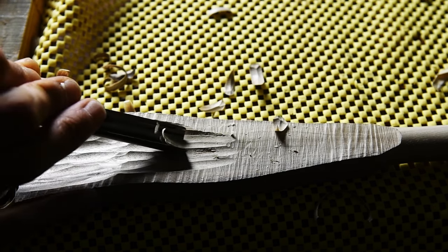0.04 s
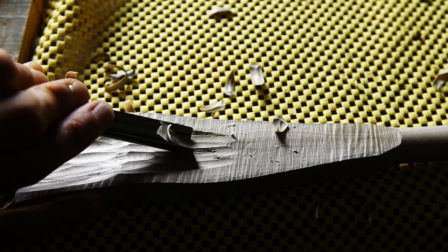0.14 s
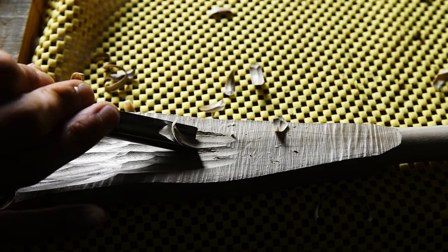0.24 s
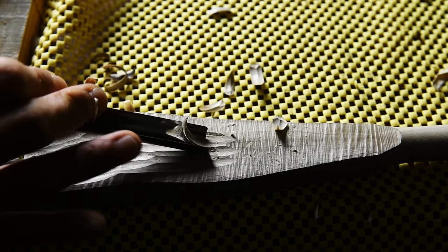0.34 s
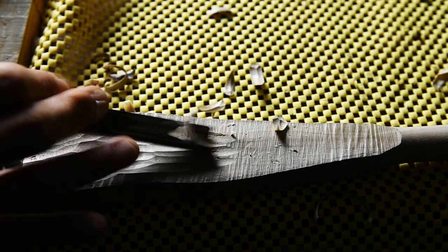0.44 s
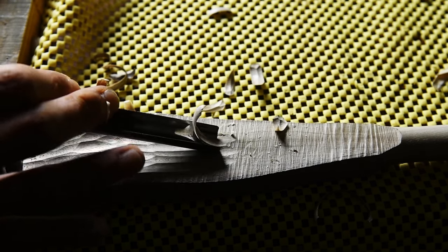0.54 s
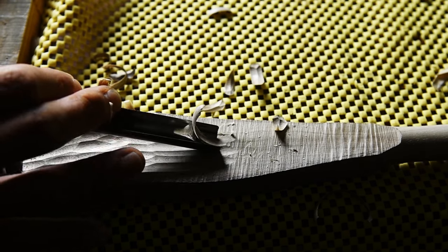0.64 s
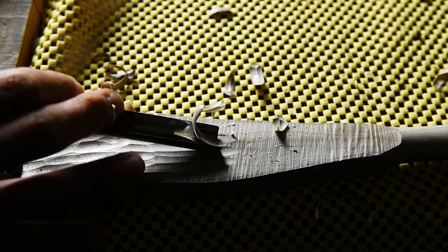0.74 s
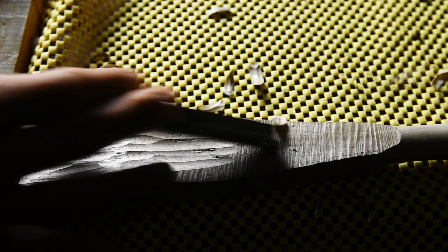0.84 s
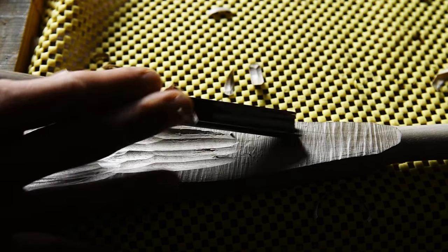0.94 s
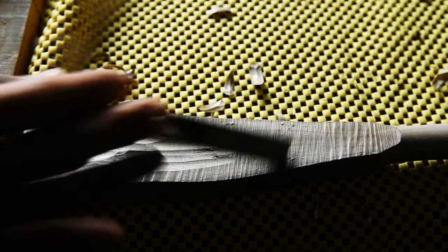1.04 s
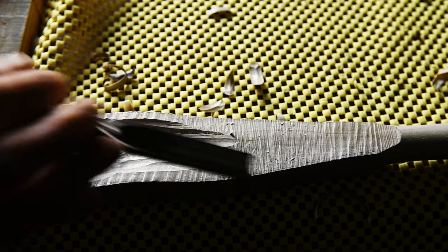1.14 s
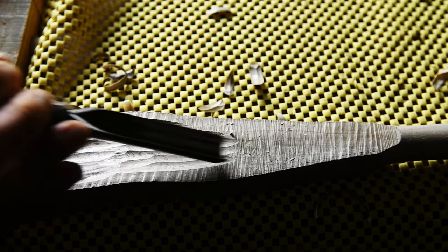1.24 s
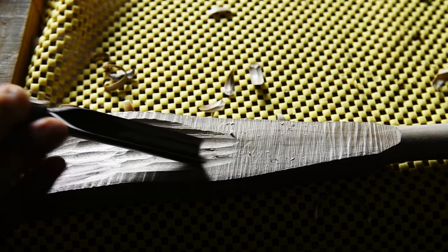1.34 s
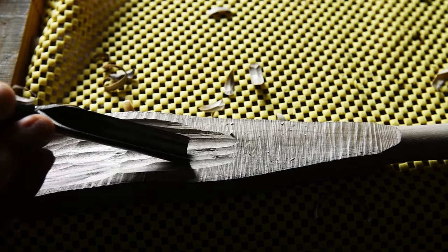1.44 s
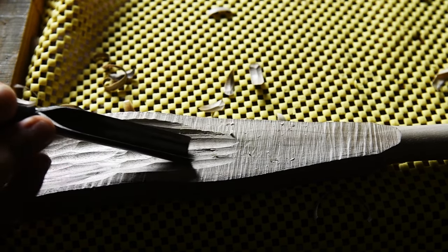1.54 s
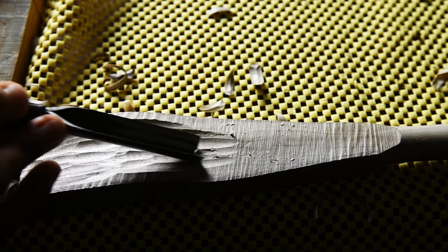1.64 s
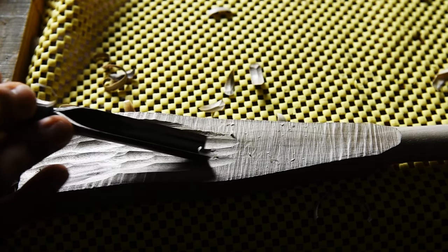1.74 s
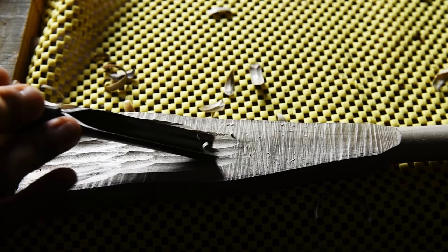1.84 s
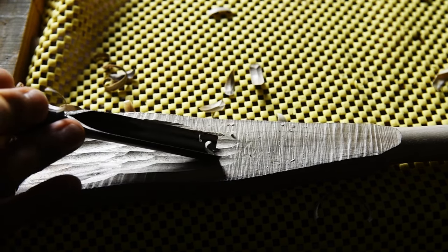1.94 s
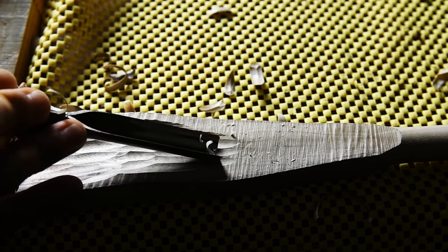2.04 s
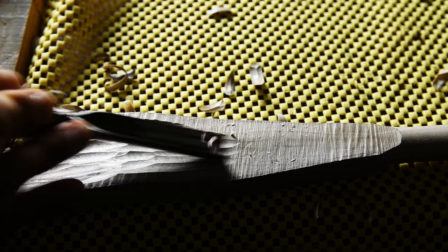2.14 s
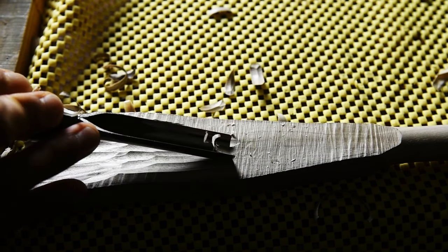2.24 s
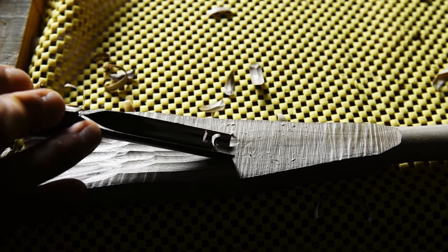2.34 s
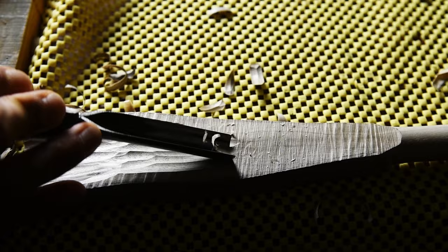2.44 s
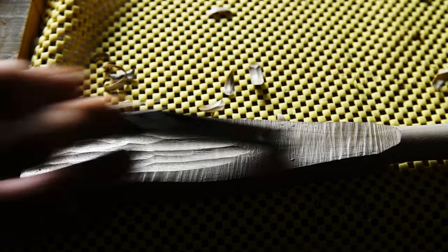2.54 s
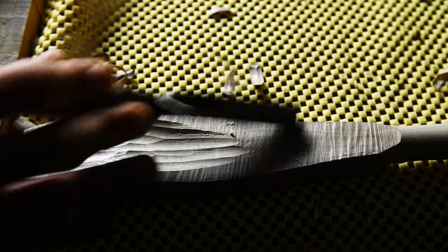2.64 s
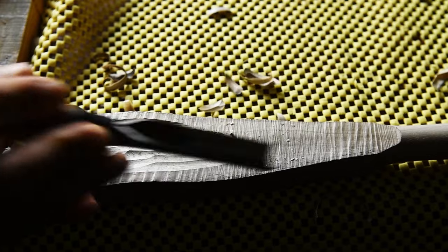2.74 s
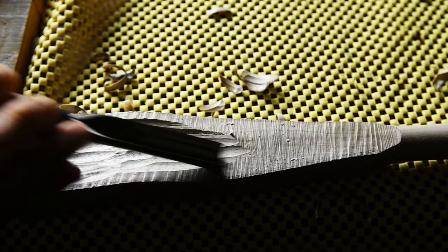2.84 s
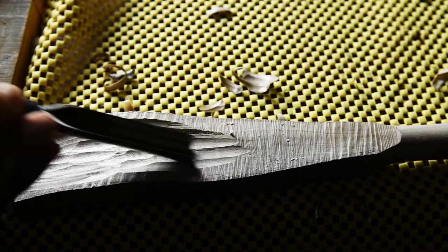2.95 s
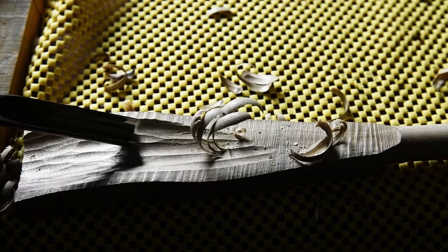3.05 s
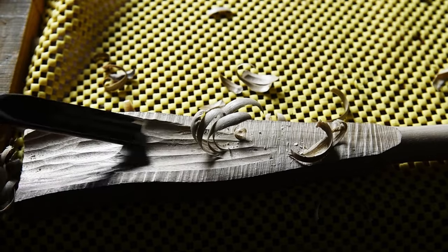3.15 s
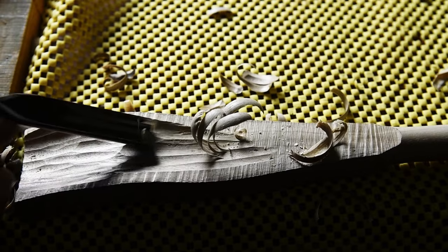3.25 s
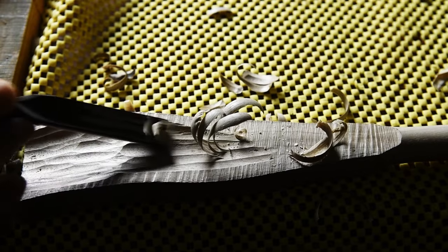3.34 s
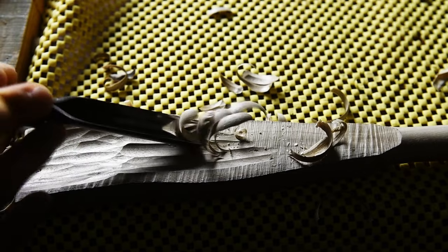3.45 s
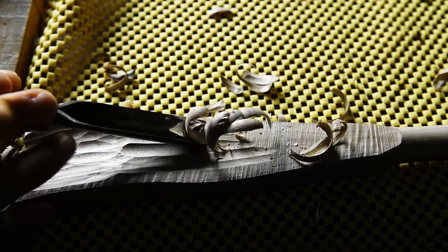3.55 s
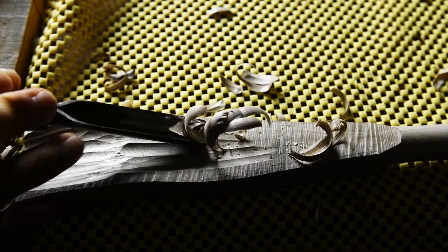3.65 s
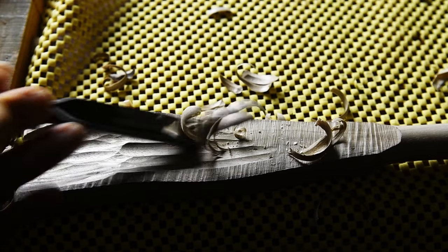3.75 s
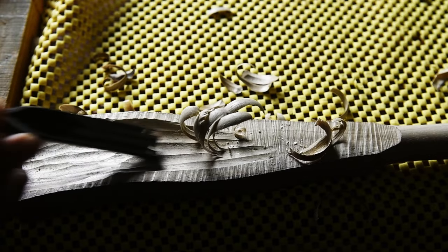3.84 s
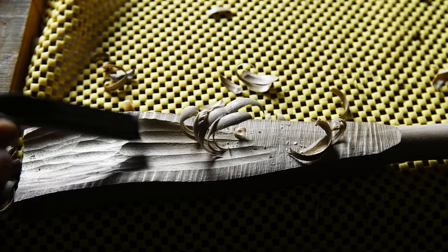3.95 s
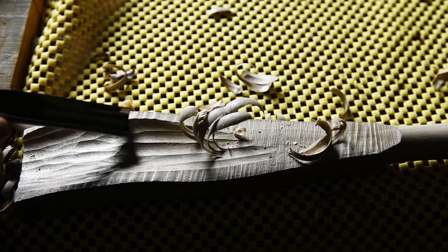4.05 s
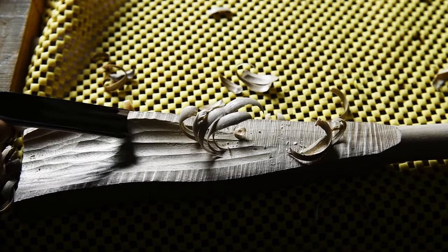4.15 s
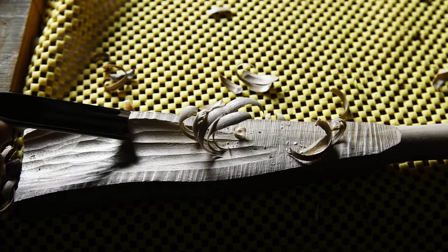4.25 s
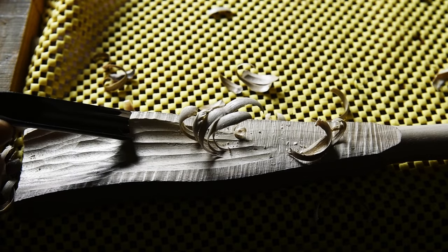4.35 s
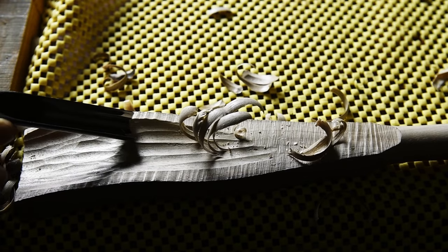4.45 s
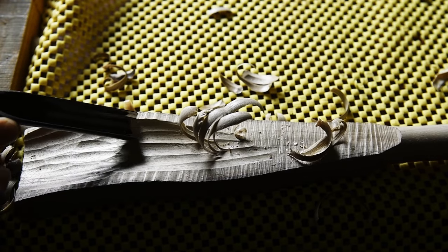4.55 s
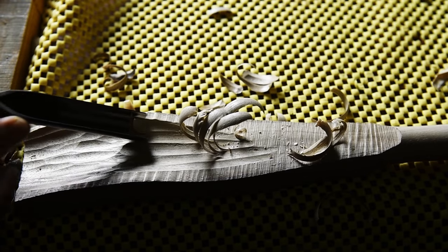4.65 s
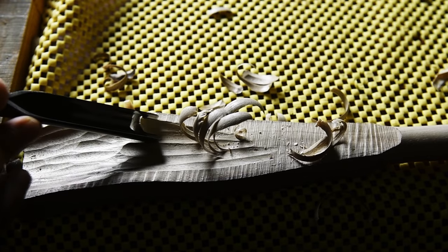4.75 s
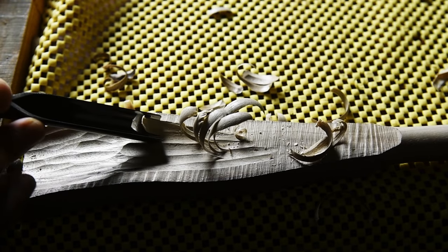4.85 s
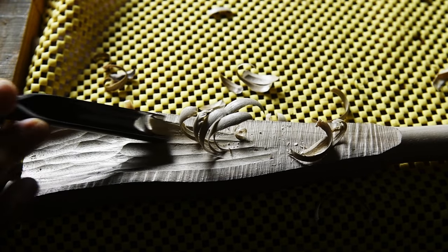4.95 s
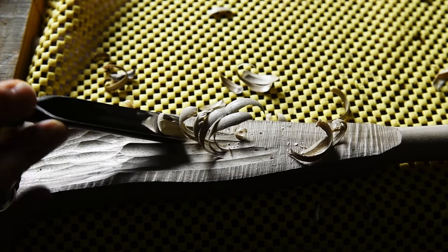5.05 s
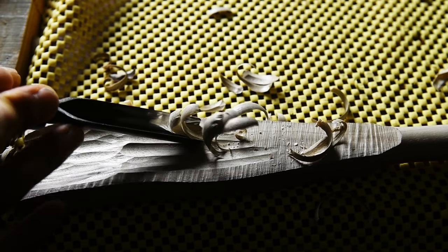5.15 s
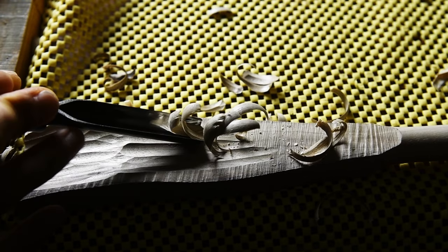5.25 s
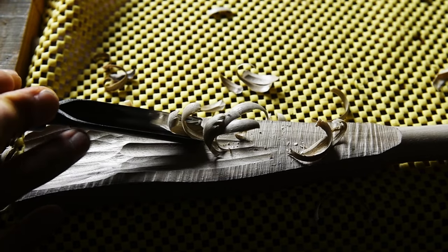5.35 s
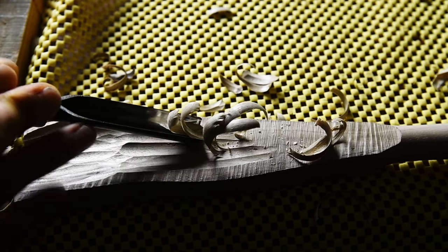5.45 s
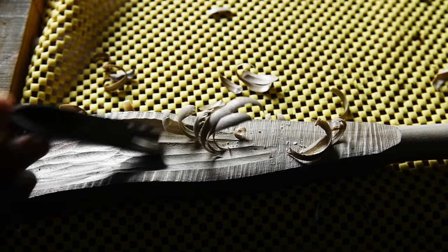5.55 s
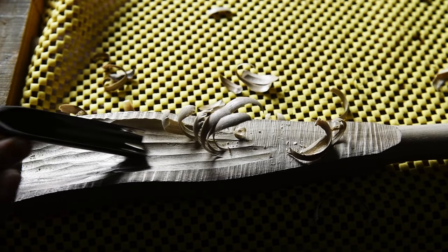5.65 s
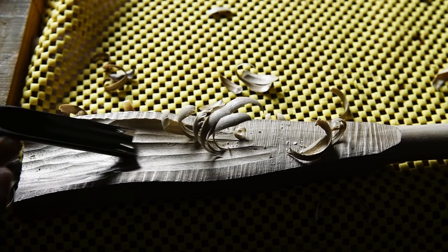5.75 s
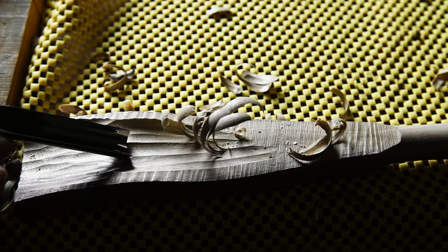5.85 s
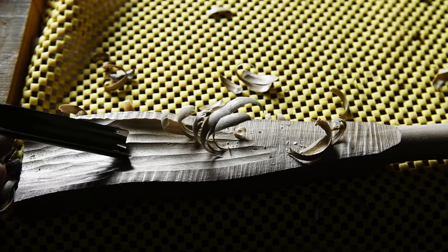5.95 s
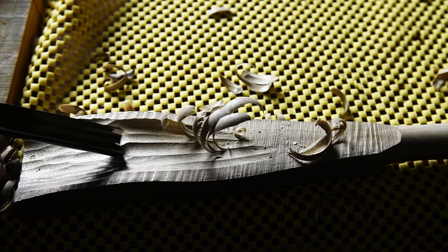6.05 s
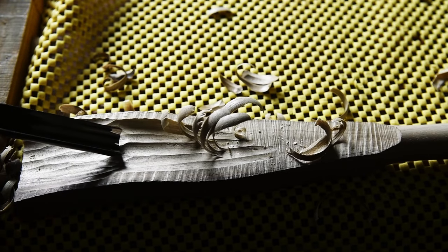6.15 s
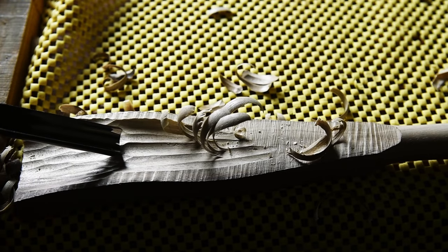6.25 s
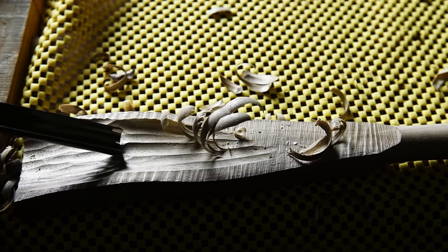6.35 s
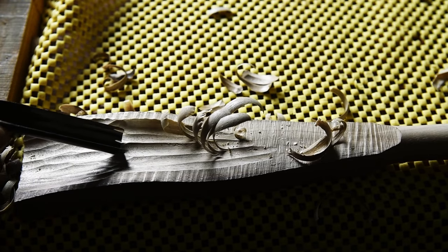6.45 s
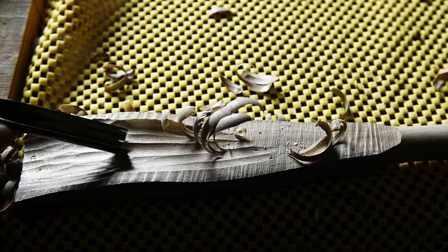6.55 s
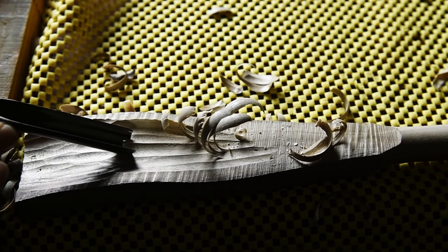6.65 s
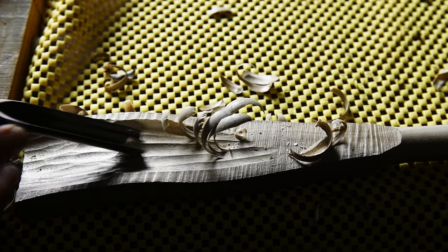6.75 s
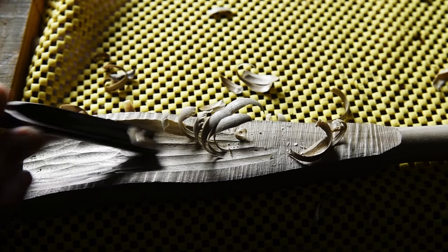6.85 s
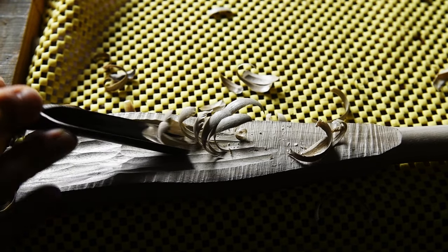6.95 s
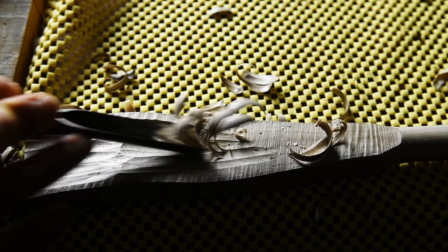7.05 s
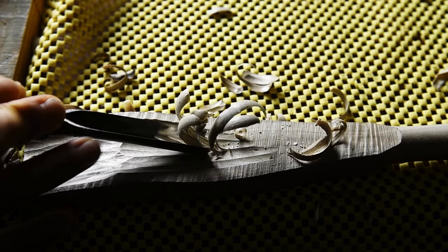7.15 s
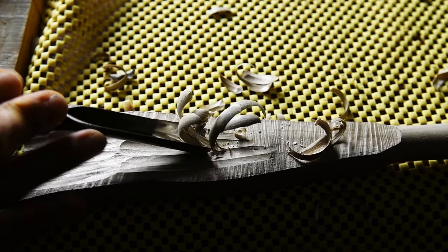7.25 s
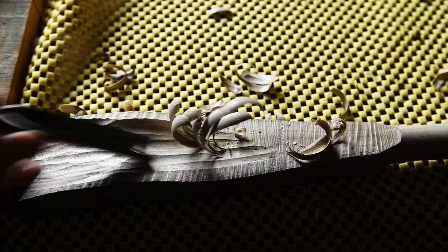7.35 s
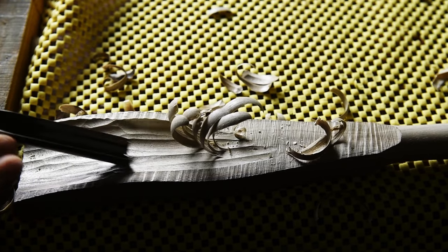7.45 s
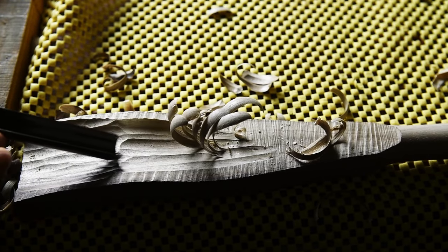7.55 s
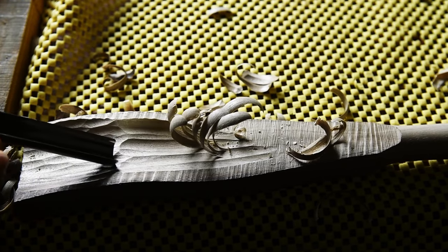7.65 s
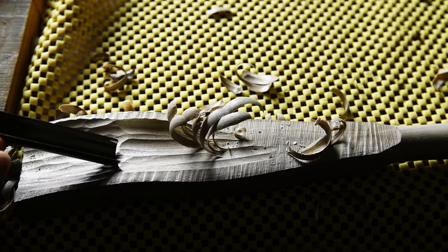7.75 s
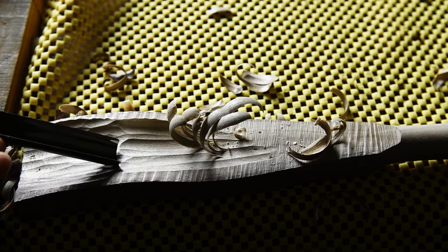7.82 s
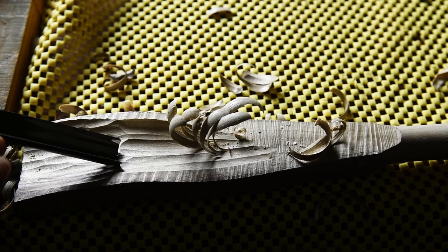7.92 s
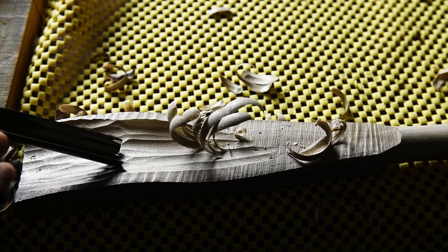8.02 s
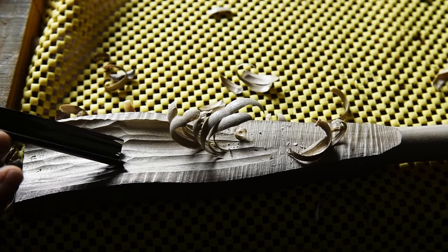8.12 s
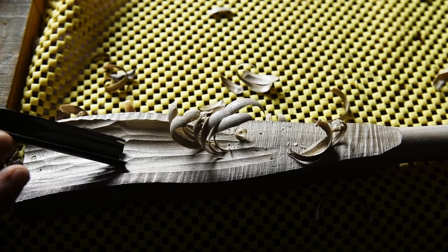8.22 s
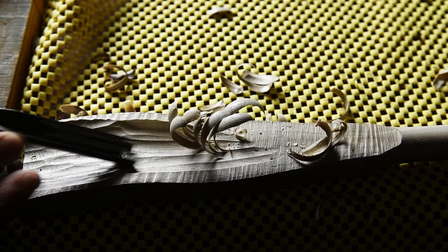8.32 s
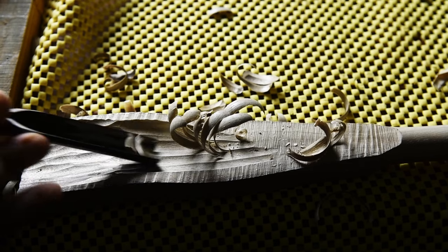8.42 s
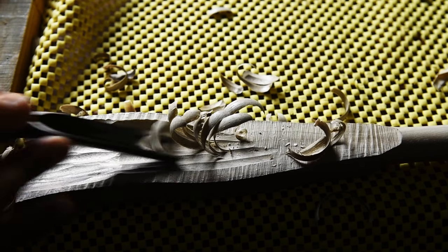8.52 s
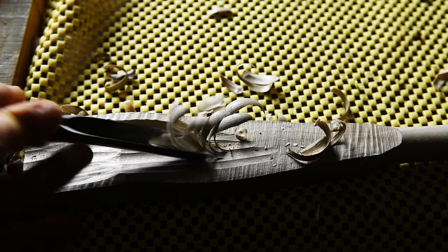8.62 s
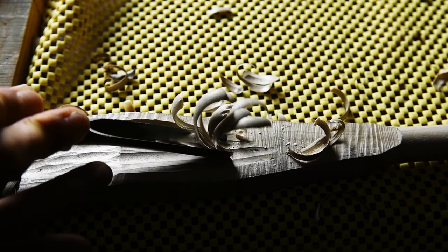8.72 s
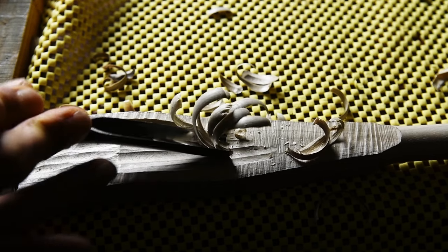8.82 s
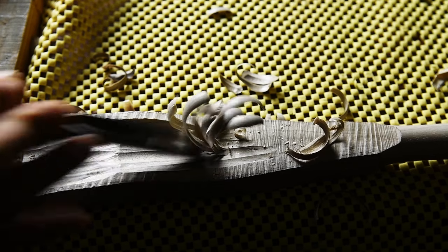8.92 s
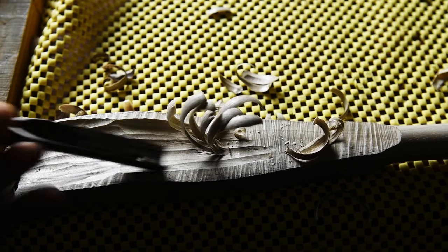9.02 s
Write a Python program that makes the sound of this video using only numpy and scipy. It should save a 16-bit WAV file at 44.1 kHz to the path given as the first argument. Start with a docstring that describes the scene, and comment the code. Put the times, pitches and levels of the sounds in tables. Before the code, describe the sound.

A hand gouge pares hardwood in uneven, crackling scrapes, with sharp tool knocks and snapping shavings, close up in a small workshop.

```python
"""A hand gouge pares hardwood in uneven, crackling pushes, close and almost mono in a small workshop.
The edge sticks and slips, tearing fibres that ring the blade and the wooden blank; dry shavings snap.
The tool knocks and drags on the wood, the bench thuds under the pushes, and a woven sleeve swishes.
Faint high rustles come between cuts; room tone and mains hum lie underneath."""
import sys
import numpy as np
from scipy import signal
from scipy.fft import irfft
from scipy.io import wavfile
from scipy.ndimage import uniform_filter1d

SR = 44100
rng = np.random.default_rng(int(sys.argv[2]) if len(sys.argv) > 2 else 0)


def store_wav(level_fs):
    """Save 16-bit WAV to argv[1]."""
    pcm = np.round(np.clip(np.atleast_2d(level_fs), -1, 1) * 32767)
    wavfile.write(sys.argv[1], SR, pcm.T.astype(np.int16))


N = 400428
T = np.arange(N) / SR

def gain_of(db):
    """dB to gain."""
    return 10 ** (np.asarray(db) / 20)

def unit(h):
    """Scale to energy 1."""
    return h / np.sqrt(np.sum(h ** 2) + 1e-30)

def add(mix, start_s, sound):
    """Mix a sound in at start_s."""
    part = mix[round(start_s * SR):][:len(sound)]
    part += sound[:len(part)]

def stroke(length_s, top, first, peak, last):
    """Ramp from first to peak at fraction top of the length, then to last."""
    position = np.linspace(0, 1, round(length_s * SR))
    return np.interp(position, (0, np.clip(top, .01, .99), 1), (first, peak, last))

def soft(x):
    """Taper both ends."""
    return x * signal.windows.tukey(len(x), .1)

def slow_noise(samples):
    """Twice-smoothed noise, standard deviation 1."""
    noise = uniform_filter1d(uniform_filter1d(rng.standard_normal(N), samples), samples)
    return noise / noise.std()

def colour(x, points):
    """Filter x by a spectrum of (Hz, relative dB) points."""
    grid_hz = np.fft.rfftfreq(4096, 1 / SR)
    hz, db = np.transpose(points)
    spectrum = gain_of(np.interp(np.log(grid_hz + 1), np.log(hz), db))
    response = np.roll(irfft(spectrum), 2048) * np.hanning(4096)
    return signal.oaconvolve(x, unit(response), "same")

def ring(modes, floor_hz):
    """Impulse response of resonances that radiate little below floor_hz."""
    t = T[:8192]
    response = sum((-1) ** k * gain_of(db) * width_hz * np.exp(-np.pi * width_hz * t)
                   * np.sin(2 * np.pi * hz * t) for k, (hz, width_hz, db) in enumerate(modes))
    return unit(signal.sosfilt(signal.butter(2, floor_hz, "high", fs=SR, output="sos"), response))

# Room tone spectrum. Each row: frequency in Hz, relative density in dB.
AIR_SPECTRUM = [(15, -60), (25, -17.5), (48, -16.5), (87, -6.5), (108, -11), (242, -4.5), (301, -10.5),
                (451, -9.5), (641, -9), (1290, -11), (1840, -20.5), (14000, -29.5), (16000, -28)]
# Mains partials. Each row: frequency in Hz, nominal rms level in dB.
HUM_PARTIALS = [(59.2, -79.5), (118.4, -79.5), (236.9, -81)]

def air(noise_db=-65.5):
    """Room tone with mains hum that wavers in strength."""
    tone = gain_of(noise_db) * colour(rng.standard_normal(N), AIR_SPECTRUM)
    for hz, db in HUM_PARTIALS:
        waver = uniform_filter1d(rng.standard_normal(N), 6000)
        amplitude = gain_of(db + 3 + 3.5 * waver / waver.std())
        tone += amplitude * np.sin(2 * np.pi * (hz * T + rng.random()))
    return tone

# Stereo hiss spectrum. Each row: frequency in Hz, relative density in dB.
SIDE_SPECTRUM = [(15, -31), (25, -5), (249, -3), (363, -3), (1020, -9.5), (16000, -7.5)]

def side_hiss(level_db=-70.5):
    """Faint hiss that differs between left and right."""
    return gain_of(level_db) * colour(rng.standard_normal(N), SIDE_SPECTRUM)

def reflections(x, build_s=0.014, t60_s=0.31):
    """Sparse, dull workshop echoes build up and die away."""
    taps = np.zeros(SR // 2)
    slots, t = np.arange(200, len(taps) - 20, 20), T[:len(taps)]
    taps[slots + rng.integers(0, 20, len(slots))] = rng.choice([-1., 1.], len(slots))
    build = 1 - np.exp(-(t / build_s) ** 2)
    tail = signal.lfilter([1], [1, -.87], taps * build * gain_of(-60 * t / t60_s))
    return signal.oaconvolve(x, unit(tail))[:N]

# Padded bench. Each row: frequency in Hz, width in Hz, level in dB.
BENCH_MODES = [(57.6, 31, -7), (123, 51, -5)]
# Shoves on the bench. Each row: start in seconds, drive level in dB.
BENCH_THUDS = [(0.0, -55), (0.321, -39), (0.363, -51), (0.791, -37.5), (2.154, -54), (2.518, -43),
               (2.809, -56), (3.041, -56), (3.3, -46), (3.364, -48), (3.438, -47), (3.51, -51.5),
               (6.8, -48), (7.045, -47), (8.346, -35), (8.66, -40)]

def thuds(length_s=0.032):
    """The weight of a push shoves the bench's low modes, softly and roughly."""
    shove, u = np.zeros(N), np.arange(0, 5, 1 / (SR * length_s))
    for start_s, db in BENCH_THUDS:
        add(shove, start_s, gain_of(db - 5.0) * 3 * u * np.exp(1 - 3 * u))
    return signal.oaconvolve(shove * rng.standard_normal(N), ring(BENCH_MODES, 39))[:N]

# Arm moves. Each row: start and length in seconds, fastest point 0-1, peak level in dB,
# thread pitch in Hz at the start, fastest point and end, fraction of cloth rubbing.
SLEEVE_MOVES = [(1.055, .36, 0.5, -49.5, 10740, 11600, 8900, 0.46),
                (1.449, 0.18, 0.32, -63, 8040, 9500, 5400, 0.77),
                (1.567, 0.074, 0.54, -67, 9000, 7800, 8400, 0.56),
                (1.632, 0.15, 0.46, -65.5, 9040, 9800, 9500, 0.7),
                (4.294, 0.12, 0.47, -71.5, 8500, 7500, 7500, 0.97),
                (5.311, 0.26, 0.28, -54.5, 10600, 11500, 9600, 0.98),
                (5.487, 0.089, 0.053, -63, 9600, 9700, 8800, 0.4),
                (5.565, 0.068, 0.45, -64, 8150, 8500, 6400, 0.3),
                (5.682, 0.13, 0.42, -71, 8500, 7950, 7900, 0.2),
                (7.562, 0.19, 0.66, -64.5, 7800, 9400, 9000, 0.88),
                (7.994, 0.25, 0.34, -69.5, 7200, 6700, 6400, 0)]
# Weaker thread whistles. Each row: pitch ratio, relative level in dB.
SIDE_THREADS = [(.8, -22), (.88, -8), (.93, -8), (1.04, -9)]
# Cloth hiss bands. Each row: frequency in Hz, width in Hz, level in dB.
CLOTH_BANDS = [(6940, 370, -2.5), (9300, 900, -1.5), (10880, 930, 5)]

def sleeve(ends_db=-14.5, rustle_db=-1.5):
    """Crossing threads whistle at a pitch set by arm speed, fuzzier as more cloth rubs."""
    hz, area, strength = np.full(N, 8000.), np.zeros(N), np.zeros(N)
    for start_s, length_s, top, db, start_hz, top_hz, end_hz, rubbing in SLEEVE_MOVES:
        speed = np.sin(np.pi / 2 * stroke(length_s, top, 0, 1, 2.7))
        rest_hz = np.where(np.arange(len(speed)) < speed.argmax(), start_hz, end_hz)
        span = slice(round(start_s * SR), round(start_s * SR) + len(speed))
        hz[span] = rest_hz + (top_hz - rest_hz) * speed
        area[span] = rubbing
        strength[span] = soft(gain_of(db + ends_db * (1 - speed)))
    whistles, power = np.zeros(N), np.zeros(N)
    for ratio, db in [(0.99, None)] + SIDE_THREADS:
        wobble, drift, flutter = (unit(uniform_filter1d(rng.standard_normal(N), samples)) * np.sqrt(N)
                                  for samples in (30, 2500, 900))
        size = 1 if db is None else gain_of(db - 1.0 - 14 * (1 - area) ** 2)
        pitch_hz = ratio * hz * (1 + .04 * area ** 2 * wobble + .02 * area * drift)
        whistles += size * gain_of(5.05 * flutter) * np.sin(2 * np.pi * np.cumsum(pitch_hz) / SR)
        power += size ** 2
    hiss = signal.oaconvolve(rng.standard_normal(N), ring(CLOTH_BANDS, 3000))[:N]
    return strength * (whistles / np.sqrt(power) + gain_of(rustle_db) * area * hiss)

# Free modes of blank and tool. Each row: frequency in Hz, level in dB, base t60 in seconds.
FREE_MODES = [(247, -13.5, 0.12), (299, -5, 0.083), (837, -9, 0.11), (960, 2, 0.057), (1043, 0, 0.079),
              (1602, -3, 0.066), (1850, -9.5, 0.065), (2057, 4.5, 0.02), (2323, 4, 0.024),
              (2620, -6.5, 0.034), (3040, -9, 0.0292), (3670, -8, 0.021), (4796, -10.5, 0.02),
              (6540, -15.5, 0.015)]

def struck(spot_db, damping, scatter):
    """Free modes after a blow: the spot weights them, the grip damps and detunes them."""
    t, out = T[:8000], 0
    spot_curve_db = (*spot_db[:3], 0, 0, spot_db[3])
    for (hz, db, t60_s), (detune, size) in zip(FREE_MODES, scatter):
        weight_db = np.interp(hz, (300, 1000, 1650, 2000, 2400, 4500), spot_curve_db)
        decay = gain_of(db + weight_db + 2.8 * size - 60 * damping * t / t60_s)
        swell = 1 - np.exp(-t * hz / 1.58)
        out += decay * swell * np.sin(2 * np.pi * hz * (1 + .015 * detune) * t)
    return out

# Blows. Each row: start in seconds, peak in dB, then weights in dB for the low modes
# (up when the blank lies loose), the mode near 1600 Hz and the top modes (up on a hard landing).
TOOL_KNOCKS = [(0.832, -12.5, -10.5, -34, -24), (0.95, -36.5, -10, -13, 11), (1.31, -29.5, 10, 7, 6),
               (2.544, -26.5, -4, -12, -12), (2.774, -40.5, -12, 9, 0), (2.82, -10, -2, -7, 11),
               (2.853, -31, -8, 5, -3), (2.868, -25.5, 6, -10, -20), (2.888, -34, 0, -5, 15),
               (2.984, -33, -1, 0, 1), (3.795, -45.5, 3, 18, 18), (3.83, -25.5, -10.5, -2, 12),
               (4.035, -25, 0.5, 7.5, 2), (5.514, -34, -4, 2, 13), (5.531, -35.5, 5, -15, -15),
               (5.578, -22, -4, -2.5, 14.5), (7.303, -40.5, 4, 1, 25), (7.318, -31.5, 9, 11, 13),
               (7.674, -46, 9.5, 11, -1), (8.783, -42, -0.5, 2.5, -15), (8.838, -38, -15, -8, -6),
               (8.915, -42, 4, 5, 28), (8.937, -41, -15, 0, 11), (9.012, -22, -7, 0, 11.5)]

def knocks():
    """Steel meets wood: a short, rough contact rings the free modes."""
    out = np.zeros(N)
    for start_s, db, low_db, mid_db, top_db in TOOL_KNOCKS:
        chance = rng.standard_normal(100)
        scatter = chance[:2 * len(FREE_MODES)].reshape(-1, 2)
        modes = struck((1.77 * low_db, 0.98 * low_db, mid_db, top_db), damping=1.59, scatter=scatter)
        contact = (1 + .15 * chance[-13:]) * np.hanning(13)
        blow = np.convolve(modes, contact)
        add(out, start_s, gain_of(db) * blow / abs(blow).max())
    return out

# High modes of the steel. Each row: frequency in Hz, width in Hz, level in dB.
SHAFT_MODES = [(4140, 450, -0.5), (5080, 123, 9), (5790, 186, 9), (6820, 180, 8.5), (7530, 270, 0),
               (8460, 210, 4.5), (9480, 160, -0.5), (10460, 160, 7), (11230, 290, -5), (13210, 200, 2),
               (14750, 280, -1.5)]
# Breaking shavings. Each row: time in seconds, peak in dB, pitch in Hz.
SHAVING_SNAPS = [(0.9515, -37, 4060), (1.494, -54, 12600), (1.7714, -49, 10400), (2.6, -32.5, 4800),
                 (3.7436, -45, 8020), (3.765, -41, 12900), (4.793, -50, 8000), (5.2294, -45, 2210),
                 (5.3736, -41, 3580), (5.4954, -46, 4700), (6.833, -40, 13300), (7.052, -13.5, 10700),
                 (7.062, -38, 11000), (7.069, -29, 11500), (7.075, -30, 10500), (7.1863, -29.5, 13400),
                 (7.224, -35, 13700), (7.295, -41, 10700), (7.305, -43, 7000), (7.32, -39, 10800),
                 (8.837, -43, 5350), (8.9283, -35, 8700), (8.9444, -40, 10700)]

def snaps(width_ratio=0.18, steel_db=-7, curl_db=-11.5, curl_s=0.0095):
    """A dry shaving cracks, rings at its own pitch and shakes the steel; the curl rustles on."""
    out, t = np.zeros(N), T[:2600]
    steel = ring(SHAFT_MODES, 3000)[:300] * np.exp(-t[:300] / 0.00128)
    envelope = unit(t * np.exp(-t / 0.00055)) + gain_of(curl_db) * unit(t * np.exp(-t / curl_s))
    for time_s, db, hz in SHAVING_SNAPS:
        burst = rng.standard_normal(len(t)) * envelope
        shaving = np.exp(-np.pi * width_ratio * hz * t) * np.sin(2 * np.pi * hz * t)
        crack = np.convolve(np.diff(burst, prepend=0), shaving[:300])
        snap = unit(crack) + gain_of(steel_db) * unit(np.convolve(burst, steel))
        add(out, time_s - .001, gain_of(db) * snap / abs(snap).max())
    return out

# Pushes of the edge, and faint high rustles between them. Each row: start and length in seconds,
# loudest point 0-1, blade drive in dB, blank and fizz drives in dB re blade.
PUSHES_AND_RUSTLES = [(0.0, 0.55, 0.026, -70, 4.5, -4.5), (0.745, 0.28, 0.26, -48, 6.5, -2),
                      (1.534, 0.4, 0.23, -57, -14.5, -18), (2.117, 0.14, 0.4, -56, 5.5, -5),
                      (2.467, 0.27, 0.38, -59, 14.5, 4), (3.034, 0.66, 0.037, -48.5, -14, -16.5),
                      (3.18, 0.43, 0.63, -54, 9.5, -0.5), (3.727, 0.11, 0.3, -72, -15, 3),
                      (4.39, 0.35, 0.96, -51, -15, -11.5), (4.586, 0.28, 0.2, -63.5, 9.5, 6.5),
                      (4.902, 0.38, 0.21, -59.5, 2, 6.5), (5.307, 0.19, .35, -75, -6, 13),
                      (6.381, 0.89, 0.58, -38.5, -6.5, -12), (7.94, 0.45, .93, -69, -25, -9),
                      (8.284, 0.43, 0.75, -39.5, -4, -9.5), (8.711, 0.22, 0.089, -57.5, 6, 0),
                      (8.897, 0.11, 0.3, -68.5, -7, 10)]
# The edge breaking out of a cut, and the tool dragging on the blank.
# Each row: start and length in seconds, loudest point 0-1, drive in dB.
BREAKOUTS_AND_DRAGS = [(0.788, 0.034, 0.3, -44), (0.807, 0.033, 0.31, -28.5), (2.508, .05, 0.55, -39),
                       (0.82, 0.34, 0.33, -50), (1.261, 0.13, 0.098, -61.5), (2.52, 0.27, 0.16, -40.5),
                       (2.783, 0.067, 0.63, -50), (2.837, 0.24, 0.056, -41), (3.785, 0.074, 0.066, -60),
                       (3.995, 0.14, .1, -64), (5.475, 0.3, 0.34, -56), (7.287, 0.11, 0.61, -47.5),
                       (8.702, 0.3, 0.079, -51), (8.9, 0.35, 0.41, -48.5)]

def friction(start_db=(-76, -75.5, -79.5), end_db=(-75, -71.5, -74.5), judder_db=1.7):
    """Juddering pushes, rustles, breakouts and drags: power into blade, blank, fizz and free modes."""
    power = np.zeros((4, N))
    for start_s, length_s, top, db, blank_db, fizz_db in PUSHES_AND_RUSTLES:
        peaks_db = (db, db + blank_db, db + fizz_db)
        for line, first, peak, last in zip(power, start_db, peaks_db, end_db):
            level_db = stroke(length_s, top, min(first, peak), peak, min(last, peak))
            add(line, start_s, soft(gain_of(level_db)) ** 2)
    for start_s, length_s, top, db in BREAKOUTS_AND_DRAGS:
        level_db = db + stroke(length_s, top, first=-4, peak=0, last=-24.5)
        add(power[3], start_s, soft(gain_of(level_db)) ** 2)
    return power * gain_of(judder_db * slow_noise(300)) ** 2

# Lurches of the edge. Each row: time in seconds, blade drive in dB, length in seconds,
# blank and fizz drives in dB re blade.
EDGE_SLIPS = [(0.08, -40, 0.031, -6.5, -11), (0.199, -41.5, 0.022, -26, -8.5),
              (0.319, -27.5, 0.02, -7, -13), (0.457, -35.5, 0.021, -3.5, -12.5),
              (0.473, -34, 0.014, -1.5, -11.5), (0.796, -19, 0.025, -21, -13), (0.808, -25, 0.013, -7, -3),
              (1.564, -53, 0.075, -24, -13), (1.643, -45.5, 0.027, -20, -26), (1.722, -53, 0.049, -20, -18),
              (1.825, -43, 0.051, -19, -16), (2.155, -28, 0.033, -24, -16.5), (2.516, -25, 0.025, -26, -14),
              (2.529, -14.5, 0.013, -14, -15.5), (3.047, -41.5, 0.018, -5.5, -8.5),
              (3.23, -33, 0.028, -24, -19), (3.261, -32.5, 0.018, -17, -12),
              (3.3004, -24.5, 0.01, -2.5, -11.5), (3.332, -28.5, 0.026, -4.5, -10),
              (3.366, -27, 0.038, -6, -9.5), (3.396, -24.5, 0.03, -22, -8),
              (3.441, -27.5, 0.017, -13, -8.5), (3.505, -28, 0.02, -7, -13),
              (4.454, -49, 0.022, -20.5, -14), (4.581, -38.5, .025, -16, -8.5),
              (4.599, -32, 0.019, -17, -9), (4.63, -38, 0.089, -13, -21), (4.675, -34, 0.02, -12, -6.5),
              (4.742, -30, 0.022, -2, -10.5), (4.946, -29.5, 0.022, -17, -14),
              (4.971, -29.5, 0.057, -3, -7.5), (5.017, -33.5, 0.02, 0.5, -8), (5.067, -34.5, 0.012, 2, -8),
              (5.077, -34, 0.048, -4, -6.5), (5.117, -35.5, 0.041, -1, -1.5), (6.443, -46, 0.015, -28, -31),
              (6.479, -46, 0.084, -20, -18), (6.525, -36.5, 0.02, -31, -15), (6.564, -41.5, 0.04, -13, -13),
              (6.615, -39, 0.027, -20, -11.5), (6.687, -24.5, 0.011, -11, -11.5),
              (6.733, -20.5, 0.012, -9, -11), (6.765, -29, 0.011, 2.5, -7.5),
              (6.903, -28.5, 0.016, -1.5, -11), (7.034, -29.5, 0.063, -3, -7.5),
              (8.152, -50.5, 0.06, -16, -11), (8.291, -23.5, 0.024, -16, -13),
              (8.303, -26.5, 0.03, -9, -13), (8.331, -21.5, 0.053, -8.5, -11.5),
              (8.392, -21, 0.023, -7.5, -14.5), (8.412, -27, 0.035, -26, -12.5),
              (8.445, -27, 0.035, -3.5, -13.5), (8.483, -24.5, 0.013, -1.5, -12.5),
              (8.509, -28, 0.078, -9, -12), (8.55, -31, .02, -13, -17), (8.588, -33, 0.018, -6, -2),
              (8.633, -31, 0.026, -1, -3.5), (8.662, -25, 0.039, -5, -5.5),
              (8.688, -34.5, 0.025, 3.5, -2.5)]

def slips(creep_s=0.021, creep_db=-19):
    """The edge creeps, then lurches: power into blade, blank, fizz and free modes."""
    power = np.zeros((4, N))
    creep = soft(gain_of(creep_db + stroke(creep_s + 0.0021, 0.94, -22.5, 0, 0)))
    for time_s, db, length_s, blank_db, fizz_db in EDGE_SLIPS:
        u = np.arange(0, 4, 1 / (SR * length_s))
        lurch = gain_of(-8.5) * (2.078 * u * np.exp(1 - 2.181 * u)) ** 2.39
        for line, part_db in zip(power, (0, blank_db, fizz_db, -24)):
            gain = gain_of(db + part_db)
            add(line, time_s - 0.18 * length_s, (gain * lurch) ** 2)
            add(line, time_s - creep_s, (gain * creep) ** 2)
    return power

def fibres(per_s, spread_db):
    """Fibres break at random, a few large."""
    size = gain_of(spread_db * np.minimum(rng.exponential(1, N), 4))
    breaks = size * (rng.random(N) < per_s / SR) * rng.standard_normal(N)
    return breaks / breaks.std()

def shifting_grip(x, depth_db, width_bins):
    """Changing grip and contact make patches of the spectrum swell and sink."""
    spectrum = signal.stft(x, nperseg=256, noverlap=192)[2]
    drift = uniform_filter1d(rng.standard_normal(spectrum.shape[::-1]), 40, axis=0)
    patches = uniform_filter1d(drift, width_bins, axis=1).T
    spectrum *= gain_of(depth_db * patches / patches.std())
    return signal.istft(spectrum, nperseg=256, noverlap=192)[1][:N]

def wander(x, lag_rms_s):
    """Changing hand pressure slides the pitch of a ring."""
    return np.interp(T + lag_rms_s * slow_noise(1500), T, x)

# Blade, and blank pressed by the edge. Each row: frequency in Hz, width in Hz, level in dB.
BLADE_MODES = [(1313, 610, 0.5), (1590, 56, 12.5), (2185, 370, 8.5), (2700, 156, 14), (2860, 113, 17.5),
               (3103, 120, 13), (3620, 69, 0.5)]
BLANK_MODES = [(265.7, 100, -7), (560, 45, -1.5), (600, 52.6, 1.5), (652, 78, -1.5)]
# Fizz of tearing. Each row: frequency in Hz, relative density in dB.
FIZZ_SPECTRUM = [(2240, -4), (3800, -2.5), (4780, -3.5), (5750, -18.5), (8060, -9.5), (14500, -11.5),
                 (16000, -29)]

def gouge():
    """Tearing fibres fizz and ring blank, steel and bench; breakouts and drags ring the free modes."""
    blade, blank, fizz, free = np.sqrt(friction() + slips()) * fibres(per_s=30000, spread_db=0.74)
    fizz = shifting_grip(fizz, depth_db=3.5, width_bins=7)
    out = gain_of(-3) * colour(fizz, FIZZ_SPECTRUM)
    out += wander(signal.oaconvolve(blank, ring(BLANK_MODES, 290))[:N], lag_rms_s=.0013)
    out += wander(signal.oaconvolve(blade, ring(BLADE_MODES, 790))[:N], lag_rms_s=.0003)
    out += signal.oaconvolve(fizz, ring(SHAFT_MODES, 2300))[:N]
    out += gain_of(-19) * signal.oaconvolve(blank, ring(BENCH_MODES, 38))[:N]
    free_ring = struck((7.0, -0.5, -0.5, 5.0), damping=3.6, scatter=np.zeros((len(FREE_MODES), 2)))
    out += signal.oaconvolve(free, unit(free_ring))[:N]
    return shifting_grip(out, depth_db=1.6, width_bins=3)

def scene():
    """Carving and room at the centre, faint hiss at the sides."""
    work = gouge() + knocks() + snaps() + thuds() + sleeve()
    mid = work + gain_of(-15.5) * reflections(work) + air()
    side = side_hiss()
    return np.array([mid + side, mid - side])

def record(dry):
    """Low-pass at 15.9 kHz."""
    lowpass = signal.firwin(511, 15900, window=("kaiser", 9), fs=SR)
    return signal.oaconvolve(dry, lowpass[None], "same")

dry = scene()
out = record(dry)
store_wav(out)
```